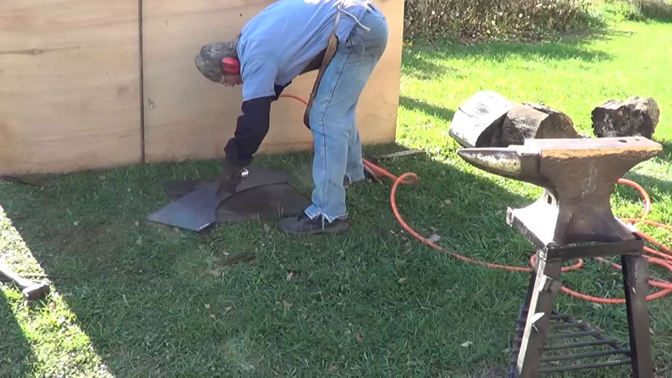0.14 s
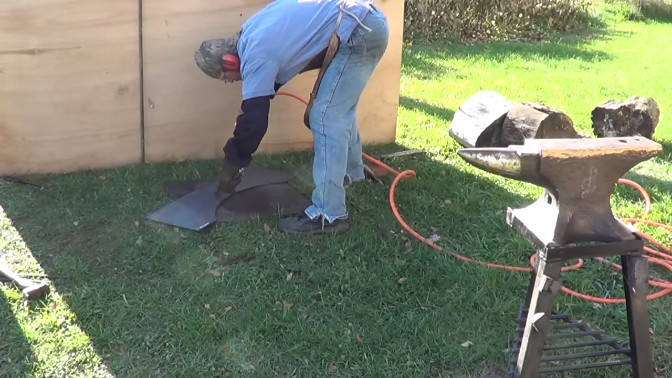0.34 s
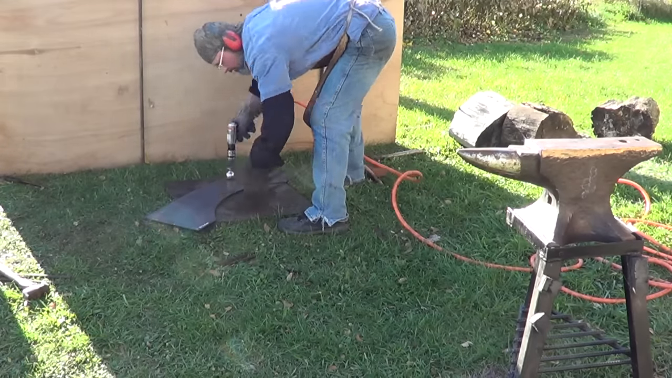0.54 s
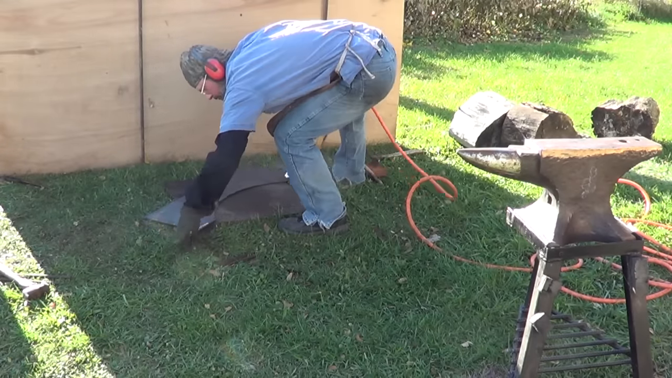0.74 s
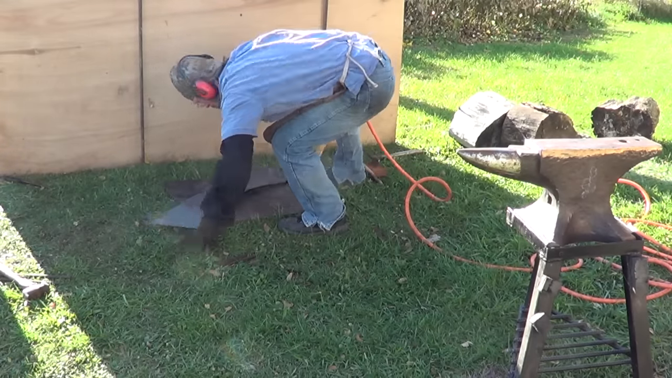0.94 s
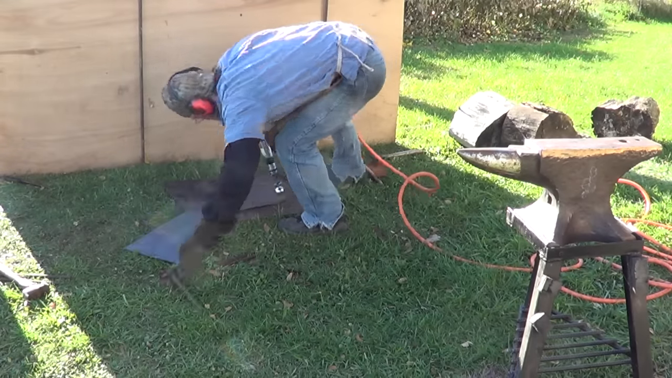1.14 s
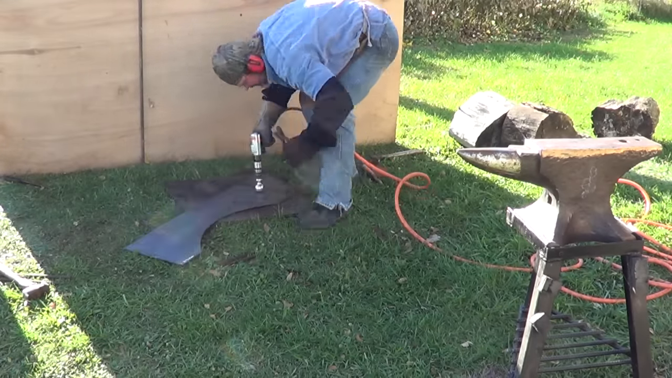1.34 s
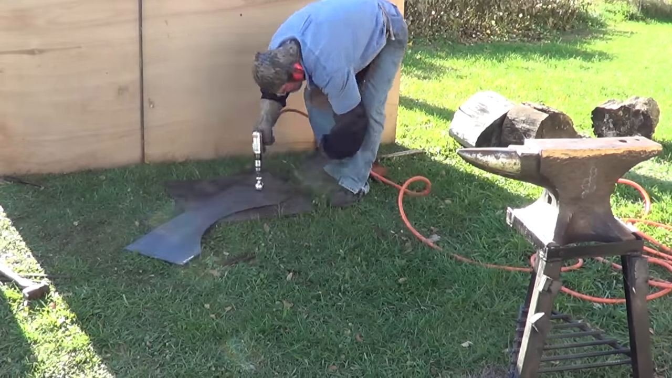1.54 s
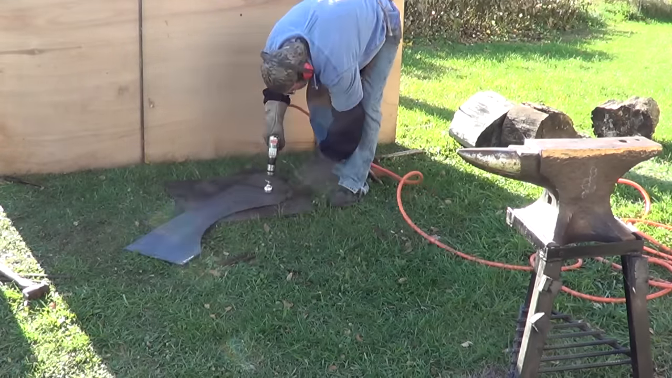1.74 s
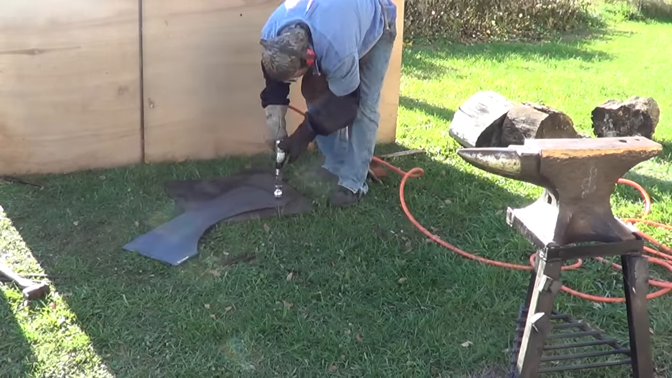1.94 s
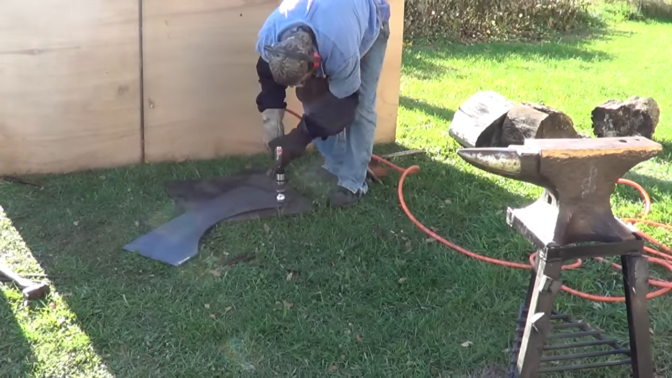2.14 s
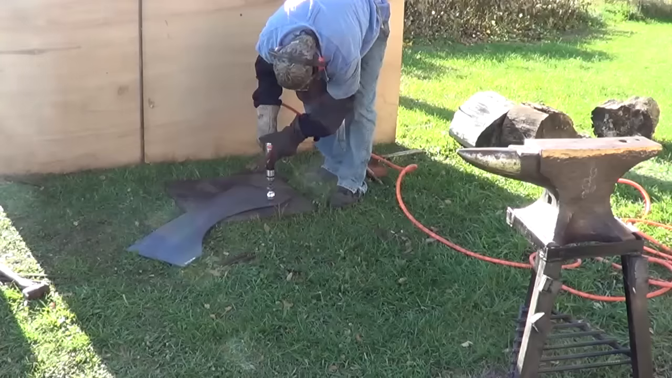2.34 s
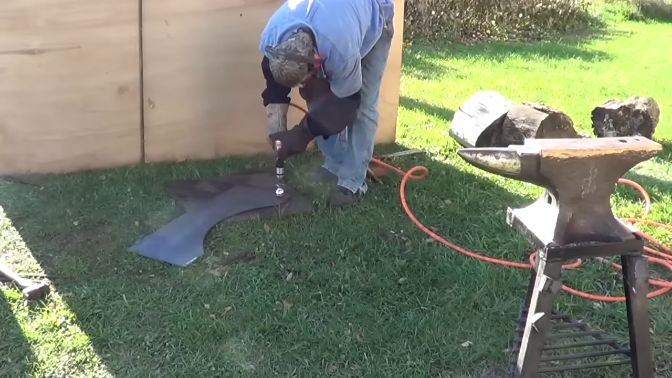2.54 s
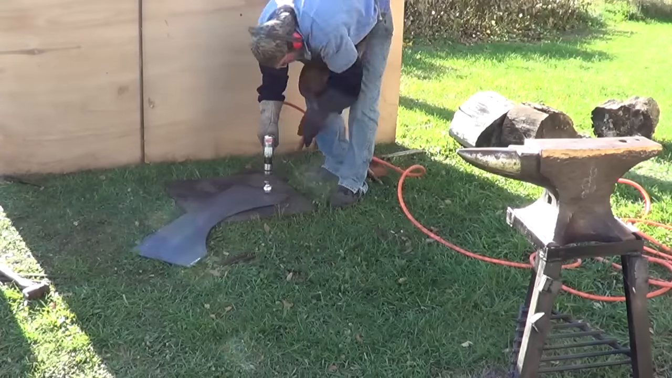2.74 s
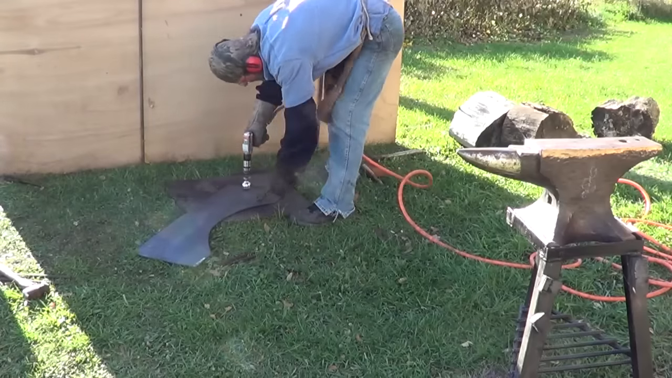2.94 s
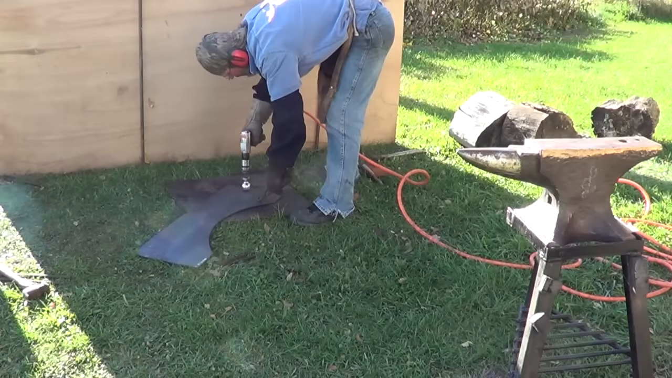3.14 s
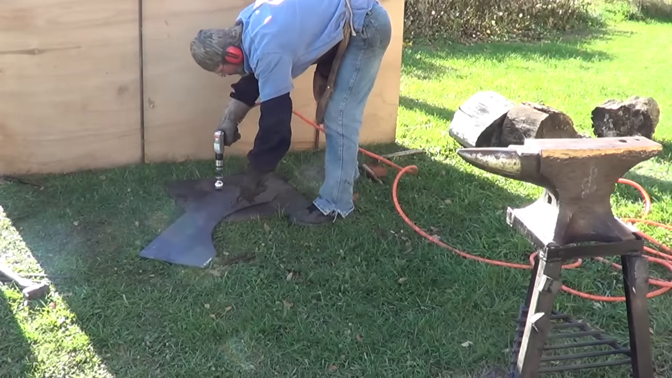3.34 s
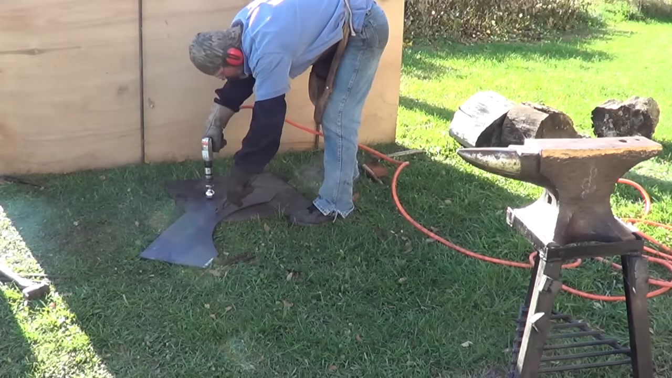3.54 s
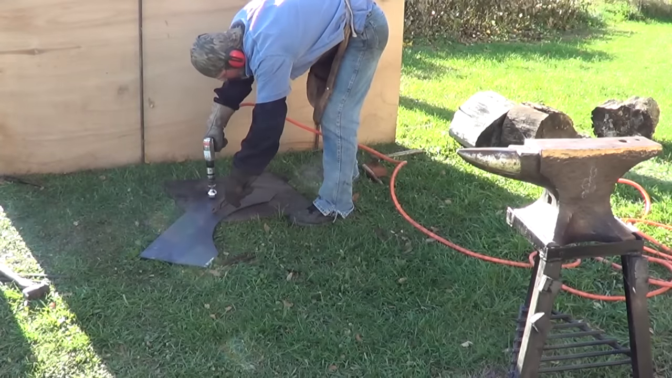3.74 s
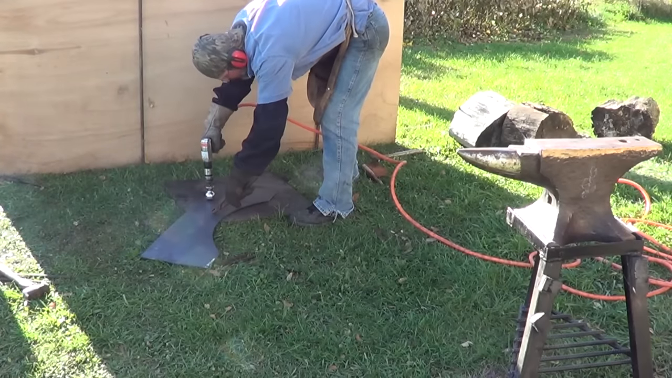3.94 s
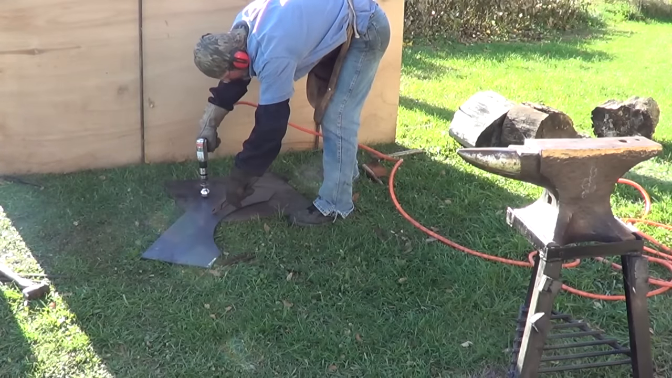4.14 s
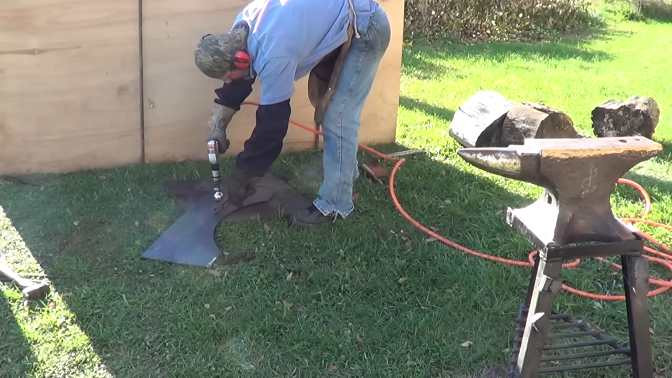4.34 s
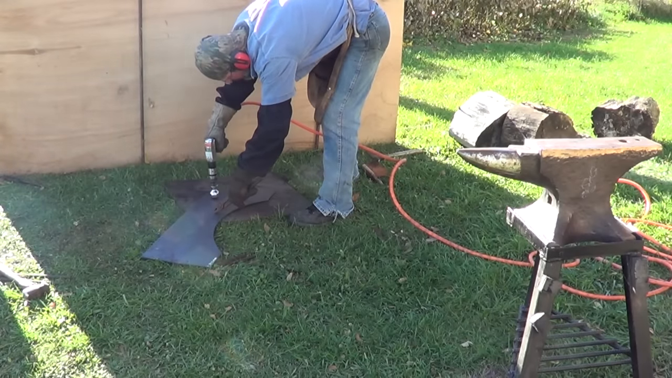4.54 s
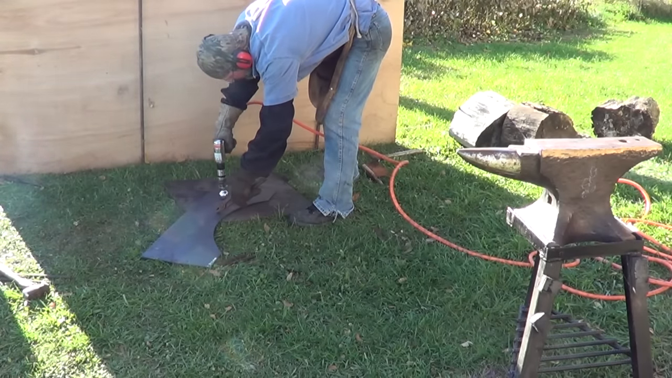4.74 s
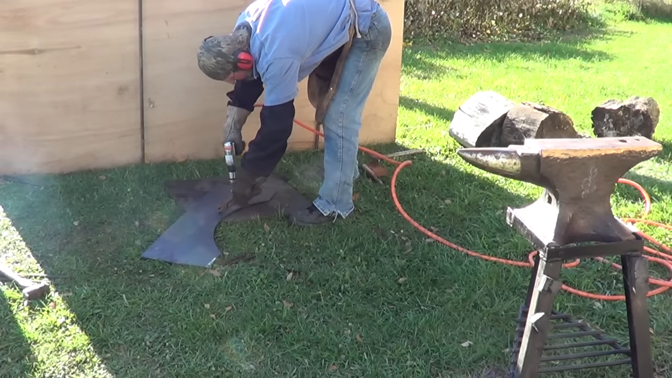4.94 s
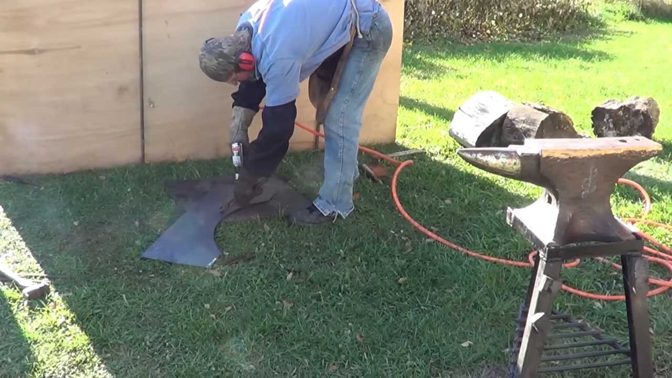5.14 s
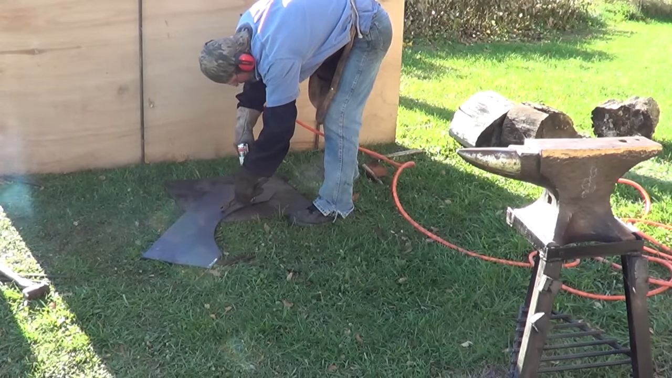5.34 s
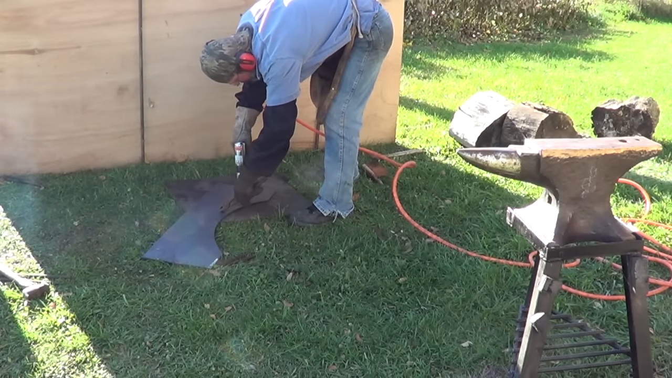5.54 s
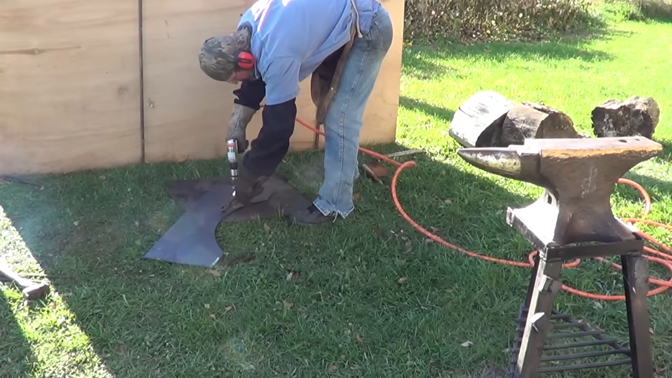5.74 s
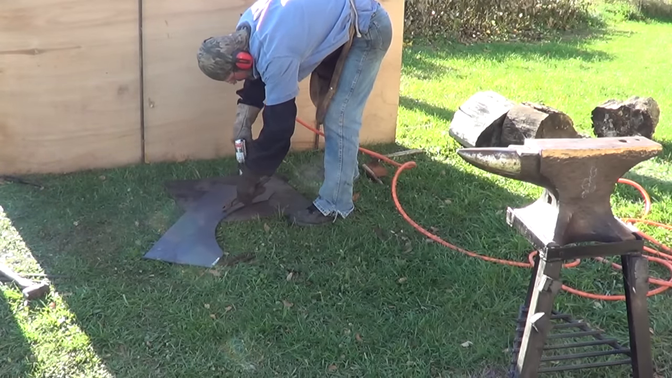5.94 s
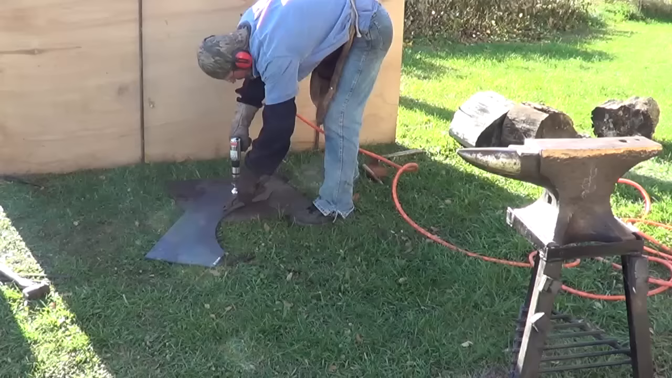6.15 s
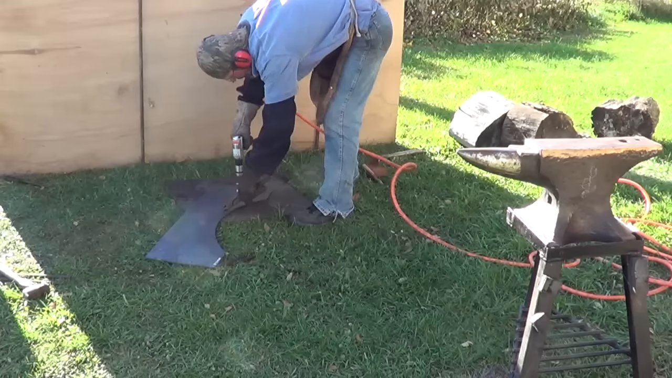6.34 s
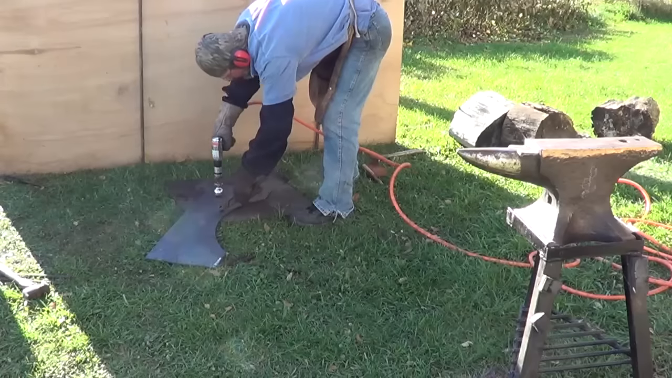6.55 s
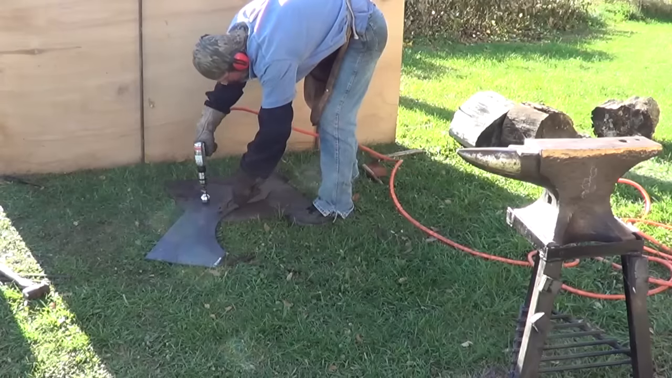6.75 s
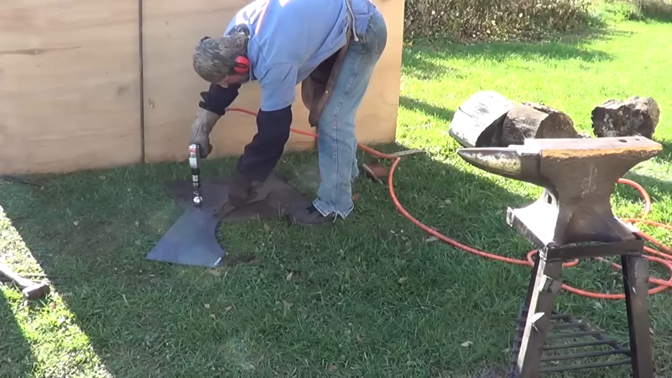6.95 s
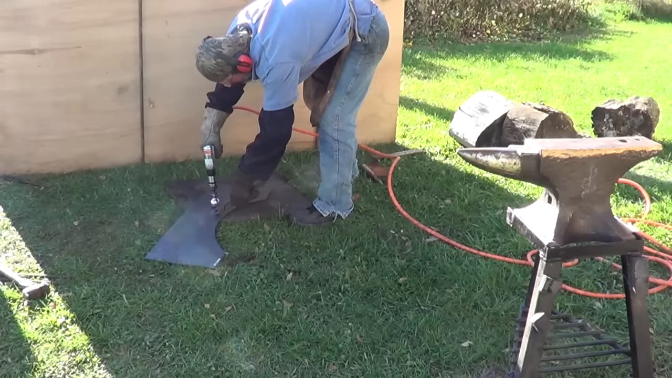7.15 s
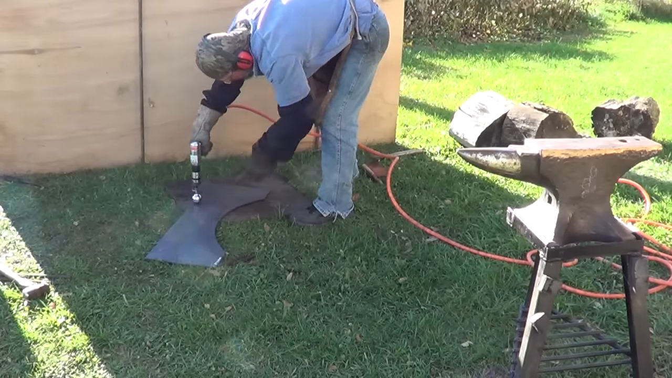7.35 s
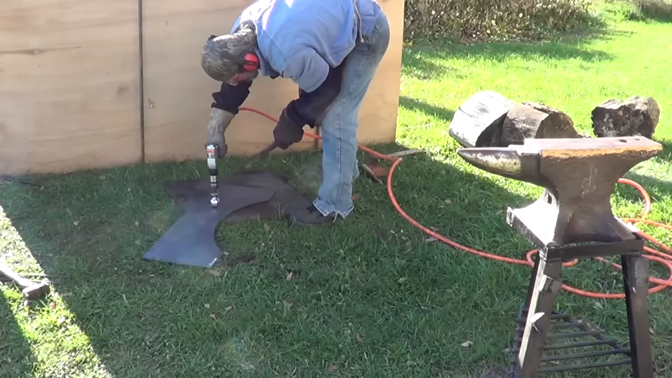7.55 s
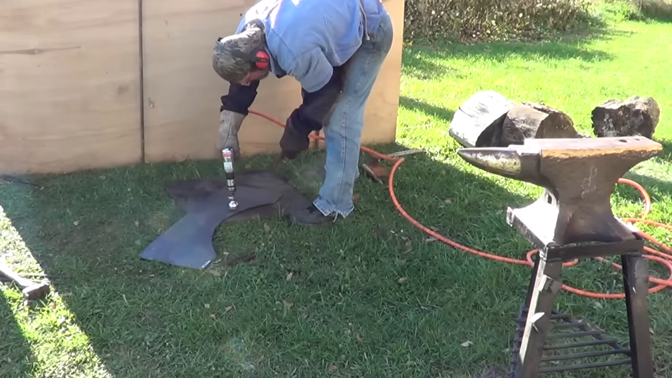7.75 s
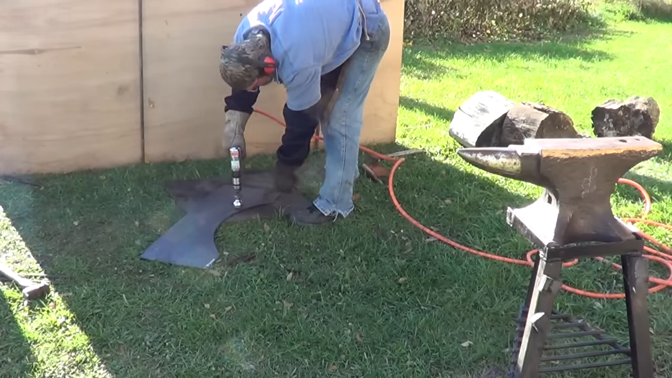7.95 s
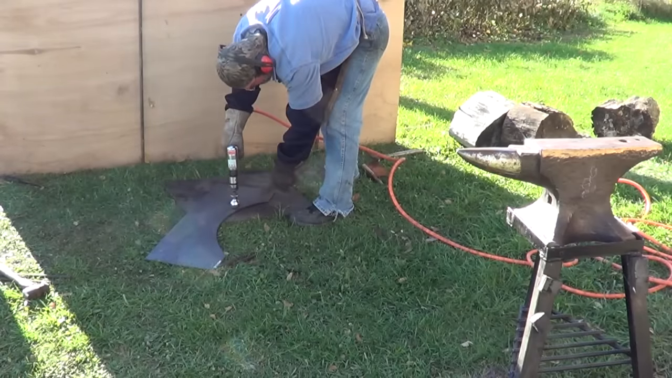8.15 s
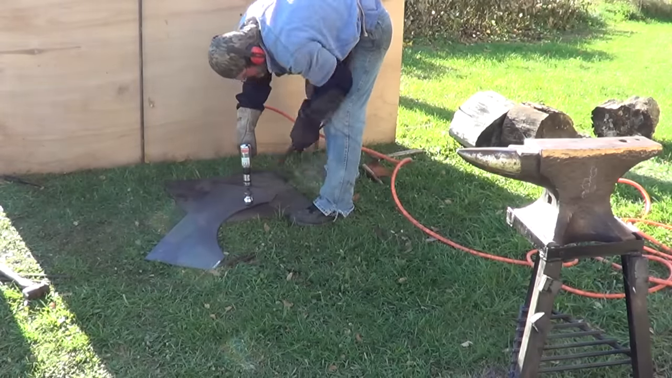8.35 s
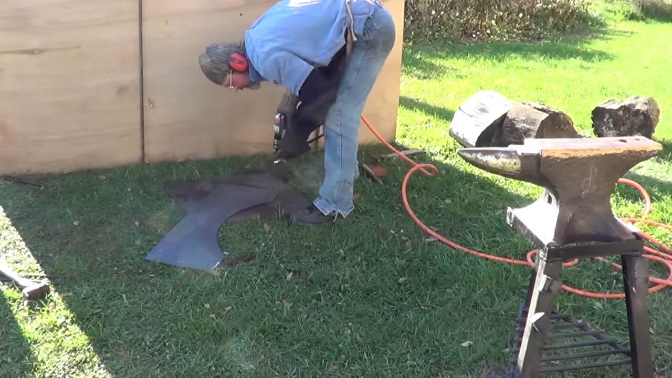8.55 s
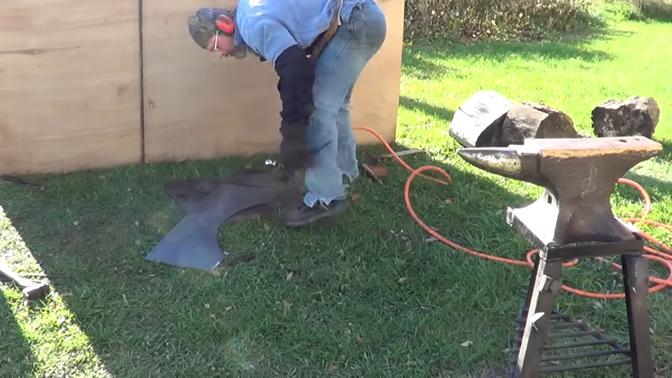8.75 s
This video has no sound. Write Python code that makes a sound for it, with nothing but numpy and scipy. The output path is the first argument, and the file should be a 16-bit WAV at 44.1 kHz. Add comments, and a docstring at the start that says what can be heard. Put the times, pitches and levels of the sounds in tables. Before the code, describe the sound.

An air chisel rattles on a steel plate, pauses as the plate clangs down, then hammers again over a droning compressor.

```python
"""An air chisel rattles on a steel plate lying on a lawn, in two bursts, over a compressor's drone.
Piston strokes buzz, the hopping tip scours the plate into ringing, and the shank sings under load.
In the pause the plate is lifted, dragged round and dropped, and the tip is set down again;
it skids, then bites. Gain control pushes the drone under the chisel and lets it swell in the pauses."""
import sys
import numpy as np
from scipy import signal
from scipy.fft import rfft, irfft, next_fast_len
from scipy.io import wavfile
from scipy.ndimage import uniform_filter1d

SR = 44100
rng = np.random.default_rng(int(sys.argv[2]) if len(sys.argv) > 2 else 0)


def output_pcm(signal):
    """Save a mono or channel-first signal as 16-bit PCM at the path in sys.argv[1].

    Samples are clipped to [-1, 1] before scaling.
    """
    pcm = np.clip(np.atleast_2d(signal).T, -1, 1) * 32767
    wavfile.write(sys.argv[1], SR, np.round(pcm).astype(np.int16))


N = 392030
TIME = np.arange(N) / SR


def amp(db):
    return 10 ** (np.asarray(db) / 20)


def unit_rms(x):
    return x / np.sqrt(np.mean(x ** 2) + 1e-20)


def curve(points):
    """Interpolates (time_s, value) points per sample."""
    return np.interp(TIME, *np.transpose(points))


def colour(x, points):
    """Filters by a (freq_hz, gain_db) curve."""
    hz, db = np.transpose(points)
    size = next_fast_len(len(x) + 4096)
    gain = amp(np.interp(np.log(np.fft.rfftfreq(size, 1 / SR) + 1), np.log(hz), db))
    return irfft(rfft(x, size) * gain, size)[:len(x)]


def wander(rate_hz):
    """Random drift, rms 1."""
    knots = rng.standard_normal(4096)
    return unit_rms(np.interp(TIME * rate_hz, np.arange(len(knots)), knots))


def resonate(x, hz, width_hz):
    """One mode, unity gain at its centre."""
    r = np.exp(-np.pi * width_hz / SR)
    angle = 2 * np.pi * hz / SR
    return signal.lfilter([1 - r, 0, r - 1], [1, -2 * r * np.cos(angle), r * r], x)


def ring(drive, hz, width_hz, skirt_hz):
    """One mode with steepened skirts, rms 1."""
    return unit_rms(resonate(resonate(drive, hz, width_hz), hz, skirt_hz))


def scour(force):
    """Countless tiny steel-on-steel contacts under a force envelope."""
    return force * rng.standard_normal(N)


def mode_cloud(t60_s):
    """Impulse response of countless close modes: decaying noise."""
    t = np.arange(SR // 4) / SR
    tail = rng.standard_normal(len(t)) * np.exp(-np.log(1000) * t / t60_s)
    return tail / np.linalg.norm(tail)


# Trigger pulls; the plate is turned between them, so each has its own colour:
# start_s, stop_s, fade_s, effort_db, release_rise_hz, release_ring_db, clatter_db, third_harmonic_db
BURSTS = [(-1.6, 0.5853, 0.01166, -19.5, 8, -20, -14, -32.5),
          (1.86, 8.521, 0.0126, -19, -0.5, -18.5, -19, -45)]
# Piston buzz, rising as the tool is leaned on; one curve per burst: time_s, level_db
BUZZ = [
    [(0.0, -36.5), (0.2, -40), (0.42, -42.5), (0.57, -50.5)],
    [(1.9, -51), (2.3, -47), (2.65, -47), (2.85, -42), (3.2, -38.5), (3.5, -40), (4.2, -39.5), (4.6, -37),
     (5.15, -43), (5.65, -40.5), (6.0, -37.5), (6.45, -35.5), (6.9, -39.5), (7.6, -36), (7.82, -47),
     (8.25, -44.5), (8.5, -48.5)],
]
SKID_S = 0.44


def air_tool(steady_hz=190.48, kick_s=0.047, bite_s=0.015, lift_s=0.0797, ease_s=1.0, usual_buzz_db=-38):
    """The stroke rate overshoots, drops as the tip bites, sags with hose pressure and rises on lifting."""
    row = np.searchsorted([burst[0] for burst in BURSTS[1:]], TIME, side="right")
    start_s, stop_s, fade_s, effort_db, rise_hz, *colours_db = np.array(BURSTS)[row].T
    age_s, left_s = np.maximum(TIME - start_s, 0), np.maximum(stop_s - TIME, 0)
    effort = amp(effort_db) * np.minimum(age_s / 0.0074, 1) * np.exp(-np.maximum(TIME - stop_s, 0) / fade_s)
    skidding = (1 - np.tanh((age_s - SKID_S) / bite_s)) / 2
    kick_hz = 13 * age_s / kick_s * np.exp(1 - age_s / kick_s)
    sag_hz = 7.3 * np.exp(-age_s / 2.5)
    rate_hz = steady_hz + kick_hz + sag_hz + 11.5 * skidding + rise_hz * np.exp(-left_s / lift_s)
    load_db = curve(np.vstack(BUZZ)) - usual_buzz_db
    eased = np.exp(-left_s / ease_s)  # the hand eases off before release
    return effort, rate_hz, load_db, eased, skidding, age_s, colours_db


# Dense ring of the plate: freq_hz, gain_db
STEEL_SPECTRUM = [(25, -26.5), (80, -22.5), (130, -21), (260, -23.5), (400, -19.5), (620, -20), (830, -4),
                  (1050, -5.5), (1600, -6.5), (2400, -2.5), (3400, 1.5), (4500, 1.5), (5100, 2), (7500, 6),
                  (10500, 5), (13500, 4.5), (15500, 2)]
# Single plate modes: pitch_hz, width_hz, gain_db, antinode_fraction, reach_fraction
PLATE_MODES = [(3210, 59, 2, 0.03, 0.1), (3630, 51, 2, 0.01, 0.11), (5513, 204, 1.5, 0.06, 0.19),
               (6225, 44, 1, 0.07, 0.12), (6627, 90, 2, 0.98, 0.1), (6840, 116, 5, 0.81, 0.24),
               (6757, 246, 2, 0.04, 0.12), (7566, 60.5, 3, 0.38, 0.21), (7846, 69, 5, 0.03, 0.14),
               (7975, 94, 3, 0.62, 0.27), (8160, 67, 8, 1.03, 0.07), (10713, 146, 1.5, 0.6, 0.26),
               (8603, 82, 3.5, 0.24, 0.4), (9990, 69, 2.5, 0.65, 0.41), (10580, 74, 2, 0.05, 0.17),
               (10970, 60, 5, 0.38, 0.22), (11480, 96, 4, 0.93, 0.2), (11810, 75, 4, 0.48, 0.19),
               (11980, 107, 4.5, 0.03, 0.12), (12254, 108, 3.5, 0.71, 0.11), (12670, 430, 0.5, 0.91, 0.52),
               (13034, 114, 2.5, 0.53, 0.36), (13400, 105, 8, 0.03, 0.2), (13564, 200, 6.5, 0.83, 0.2),
               (14040, 86, 7, 0.01, 0.02), (14163, 97, 5, 0.41, 0.29), (14300, 136, 8.5, 0.95, 0.22),
               (14520, 187, 1, 0.45, 0.2), (15230, 109, 5.5, 1.0, 0.06), (15440, 156, 4, 0.69, 0.26),
               (15760, 53, 6.5, 1, 0.24)]


def plate(force, place, direct, t60_s, modes_db, flicker_db):
    """A shifting dense ring plus single modes, each strongest with the contact on its antinode."""
    contacts = scour(force)
    shares = np.array([wander(7) for _ in range(6)])
    shares /= np.linalg.norm(shares, axis=0)
    cloud = sum(share * signal.oaconvolve(contacts, mode_cloud(t60_s))[:N] for share in shares)
    dense = colour(direct * scour(force) + cloud, STEEL_SPECTRUM) / np.hypot(direct, 1)
    drives = [scour(force) * amp(flicker_db * wander(11)) for _ in range(7)]
    modes = np.zeros(N)
    for k, (hz, width_hz, db, antinode, reach) in enumerate(PLATE_MODES):
        coupling = 1 / (1 + ((place - antinode) / reach) ** 2 / 2) ** 2
        modes += amp(db) * resonate(coupling * drives[k % len(drives)], hz, width_hz)
    return dense + amp(modes_db) * modes


def tip_hops(rate_hz=31, spread_db=3.0, decay_s=0.01495):
    """The tip hops unevenly; each landing is a short surge of its own size."""
    hop_count = np.floor(np.cumsum(rate_hz * np.exp(0.45 * wander(55))) / SR)
    landings = np.diff(hop_count, prepend=0) * amp(spread_db * wander(90))
    return unit_rms(signal.lfilter([1], [1, -np.exp(-1 / (decay_s * SR))], landings))


# Shank modes: pitch_hz, width_hz, skirt_hz, level_db, db_per_load_db
SHANK_MODES = [(5569, 74, 330, -18, 0.64), (7272, 57, 250, -14.5, 0.28), (9316, 65, 295, -10.5, 0.64)]


def shank(force, load_db):
    """The shank's own modes sing under load."""
    return sum(amp(db + per_load * load_db) * ring(scour(force), hz, width_hz, skirt_hz)
               for hz, width_hz, skirt_hz, db, per_load in SHANK_MODES)


# Close plate modes: pitch_hz, width_hz
BRIGHT_MODES = [(4385, 79), (4570, 192)]
# Their joint level: time_s, level_db
BRIGHT_LEVEL = [(0.3, -15.5), (2.1, -15.5), (2.52, -12), (2.8, -15.5), (5.7, -14.5), (6.42, -11),
                (6.7, -14), (7.75, -10), (7.92, -14.5)]


def bright_ring(force):
    """A cluster of close plate modes swells and recedes."""
    cluster = sum(ring(scour(force), hz, width_hz, skirt_hz=414) for hz, width_hz in BRIGHT_MODES)
    return amp(curve(BRIGHT_LEVEL)) * unit_rms(cluster)


# Mode flare-ups: centre_s, sigma_s, pitch_hz, level_db
FLARES = [(0.17, 0.057, 7875, -12), (3.7, 0.186, 14260, -12.5), (3.9, 0.216, 10920, -10),
          (5.1, 0.07, 11810, -10), (7.612, 0.086, 9350, -7), (7.82, 0.108, 11820, -9),
          (7.84, 0.097, 13740, -10.5)]


def flares(force, width_hz=113, skirt_hz=500):
    """The tip dwells on a spot and one mode flares up."""
    return sum(amp(db) * np.exp(-((TIME - centre_s) / sigma_s) ** 2 / 2)
               * ring(scour(force), hz, width_hz, skirt_hz) for centre_s, sigma_s, hz, db in FLARES)


# Piston harmonics: multiple, first_burst_db, second_burst_db
PISTON_HARMONICS = [(1, -30, -32.5), (4, -7.5, -25), (5, -20, -5.5), (6, -6.5, -1), (7, 2, 1.5),
                    (8, -6, -15.5), (9, -4.5, -7.5), (10, -2.5, -9), (12, -3, -8)]


def piston_buzz(cycles, load_db, third_db, second_db=-46.5, fourth_db=-42.5, stack_db=-17.5):
    """Fluttering harmonics of the stroke rate; the buzz grows under load."""
    def harmonic(k):
        return unit_rms(amp(0.55 * wander(25)) * np.cos(2 * np.pi * k * cycles))

    turned = TIME >= BURSTS[1][0]
    stack = sum(amp(np.where(turned, after_db, before_db)) * harmonic(k)
                for k, before_db, after_db in PISTON_HARMONICS)
    low_db = (second_db + 0.56 * load_db, third_db, fourth_db)
    low = sum(amp(db) * harmonic(k) for k, db in enumerate(low_db, 2))
    return low + amp(stack_db + 0.832 * load_db) * unit_rms(stack)


# Tip path along the plate: time_s, place_fraction
TIP_PATH = [(0.6, 0.03), (1.86, 0.93), (2.1, 1.03), (2.6, 0.95), (3.05, 0.75), (3.6, 0.45), (4.3, 0.38),
            (5.1, 0.42), (6.0, 0.45), (6.7, 0.43), (7.5, 0.44), (7.8, 0.65), (8.2, 0.6), (8.5, 0.73)]
# Brief losses of contact: centre_s, depth_fraction
MISSES = [(3.161, 0.54), (3.302, 0.44), (4.088, 0.48), (6.385, 0.7)]
LOW_MODE_HZ = 2119.1


def chisel(gain_db=2.5, grit_db=1.5, miss_s=0.0075, low_ring_db=-21.5, thud_db=-32.5):
    """Each stroke scours the plate and, once the tip bites, thuds on it; hops roughen the stream."""
    effort, rate_hz, load_db, eased, skidding, age_s, (release_db, clatter_db, third_db) = air_tool()
    cycles = np.cumsum(rate_hz * (1 + 0.0035 * wander(70))) / SR
    surge = unit_rms(1 + 0.714 * tip_hops())
    stroke = unit_rms(1 + 0.7 * np.exp(-(cycles % 1) / 0.097))
    contact = 1 - sum(depth * np.exp(-((TIME - centre_s) / miss_s) ** 2) for centre_s, depth in MISSES)
    force = effort * contact * surge * stroke * unit_rms(amp(grit_db * wander(400)))
    rattle = plate(force, curve(TIP_PATH), direct=0.368, t60_s=0.0677, modes_db=9, flicker_db=2.0)
    blows = np.diff(np.floor(cycles), prepend=0) * effort * (1 - skidding) * wander(110)

    low_gain = amp(low_ring_db) * (1 - eased) + release_db * 0
    low_gain = amp(low_ring_db * (1 - eased) + release_db * eased)
    low_ring = low_gain * ring(scour(force), LOW_MODE_HZ, width_hz=40.3, skirt_hz=146)
    singing = shank(force, load_db)
    clatter = amp(clatter_db) * ring(scour(force), hz=3425, width_hz=1410, skirt_hz=1800)
    thud = amp(thud_db) * ring(blows, hz=925.6, width_hz=257, skirt_hz=257)
    rings = low_ring + singing + clatter + thud + bright_ring(force) + flares(force)

    throb = unit_rms(signal.oaconvolve(surge ** 1.728, np.hanning(SR // 100), "same"))  # peaks on landings
    buzz = (1 - skidding) * throb * piston_buzz(cycles, load_db, third_db)
    skid = skidding * skid_chatter(rate_hz, cycles, age_s)
    return amp(gain_db) * (unit_rms(rattle) + rings + (buzz + skid) * unit_rms(effort) + pings())


# Compressor harmonics: multiple, level_db
DRONE_HARMONICS = [(1, -14.5), (2, -2.5), (3, -15), (4, -2), (5, -6.5), (6, -6.5), (7, -1.5), (8, 3),
                   (9, -4.5), (10, -3), (11, -3.5), (12, -15), (13, -1), (14, -2.5), (15, -7), (16, -3.5),
                   (17, -15), (18, -3.5), (19, -4), (21, -8.5), (23, -15.5), (24, -5), (25, -8.5)]


def compressor(pitch_hz=231.2, level_db=-34, top_db=-13, fall_db=0.16):
    """A steady buzzing stack whose high partials thin out."""
    cycles = np.cumsum(pitch_hz * (1 + 0.000452 * wander(6.8))) / SR
    high = [(k, top_db - fall_db * (k - 26) + 3 * rng.standard_normal()) for k in range(26, 52)]
    stack = sum(amp(db) * np.cos(2 * np.pi * k * cycles + 2.295 * rng.standard_normal())
                for k, db in list(DRONE_HARMONICS) + high)
    return amp(level_db) * unit_rms(stack)


# Air noise: freq_hz, gain_db
AIR_SPECTRUM = [(30, -32), (100, -17.5), (220, -13.5), (400, -11.5), (920, -8), (1450, -10.5), (1900, -5.5),
                (2400, -14), (3200, -9), (5700, -6.5), (6400, -10.5), (10500, -12.5), (12000, -19),
                (15500, -17.5)]


def air_rush(level_db=-40):
    """Rushing air from the compressor and the open garden."""
    return amp(level_db + 1.01 * wander(9)) * unit_rms(colour(rng.standard_normal(N), AIR_SPECTRUM))


# Handling the plate and seating the tip: start_s, level_db, decay_s
KNOCKS = [(0.737, -22.5, 0.00485), (0.872, -16, 0.00244), (1.03, -26, 0.0277), (1.052, -30, 0.0245),
          (1.088, -17, 0.0122), (1.166, -26, 0.0074), (1.183, -5.5, 0.0346), (1.213, -11, 0.0238),
          (1.243, -11, 0.0115), (1.364, -19, 0.0101), (1.402, -16.5, 0.0067), (1.609, -29, 0.0097),
          (1.647, -29.5, 0.0068), (1.69, -27.5, 0.0084)]
# Plate modes off the grass: pitch_hz, level_db
CLANG_MODES = [(845, -14), (2100, -9.5), (2720, -12), (3210, -2), (3440, -10.5), (6920, -6), (7250, -6.5),
               (7510, -8)]


def handling(ring_s=0.00445, bluntness=1.48, hardness=1.436, spread_hz=50):
    """Knocks and short scrapes ring the plate; the harder the knock, the more it clangs."""
    envelope, t = np.zeros(N), np.arange(SR // 4) / SR
    for start_s, db, decay_s in KNOCKS:
        envelope[round(start_s * SR):][:len(t)] += amp(db) * np.exp(-(t / decay_s) ** bluntness)
    force = envelope * unit_rms(amp(4.2 * wander(900)))
    steel = plate(force, place=0.364, direct=0.43, t60_s=0.063, modes_db=-3.5, flicker_db=0.5)
    modes = np.zeros(N)
    for hz, db in CLANG_MODES:
        gain = amp(db + 2.67 * wander(120))
        modes += gain * np.cos(2 * np.pi * np.cumsum(hz + spread_hz * wander(300)) / SR)
    pole = np.exp(-1 / (ring_s * SR))
    clang = signal.lfilter([1 - pole], [1, -pole], envelope ** hardness) * modes
    return clang + colour(steel, [(550, 1), (900, 6), (1400, -1.5), (2000, 3), (2900, -0.5),
                                  (3400, 3), (4100, -0.5), (15000, -2)])


# Edge touches: start_s, pitch_hz, level_db, decay_s
CLINKS = [(0.737, 2700, -31.5, 0.014), (1.03, 5685, -31, 0.022), (1.062, 2700, -27.5, 0.035),
          (1.089, 4506, -27.5, 0.0196), (1.091, 7214, -32, 0.015)]


def clinks(rise_s=0.0019):
    """A glancing touch on the plate's edge leaves one clear note."""
    out, t = np.zeros(N), np.arange(SR // 4) / SR
    for start_s, hz, db, decay_s in CLINKS:
        envelope = amp(db) * (1 - np.exp(-t / rise_s)) * np.exp(-t / decay_s)
        out[round(start_s * SR):][:len(t)] += envelope * np.sin(2 * np.pi * hz * t)
    return out


# Piston harmonics in the skid: multiple, level_db, slope_db_per_s
SKID_HARMONICS = [(2, -35.5, -46), (3, -36, -35.5), (4, -41, 17.5), (5, -28.5, -9), (6, -32.5, -3),
                  (7, -38, -5), (8, -35.5, 6.5), (9, -32.5, -1.5), (11, -28.5, -11.5)]


def skid_chatter(rate_hz, cycles, age_s, boom_hz=825, boom_half_width_hz=9.8, boom_db=11):
    """Before the bite the piston chatters fast; its fourth harmonic crosses a plate resonance."""
    detune = (4 * rate_hz - boom_hz) / boom_half_width_hz
    out = np.zeros(N)
    for k, db, slope in SKID_HARMONICS:
        boost_db = boom_db / (1 + detune ** 2) if k == 4 else 0
        chatter = unit_rms(amp(3 * wander(70)) * np.cos(2 * np.pi * k * cycles + 0.4 * wander(110)))
        out += amp(db + slope * np.minimum(age_s, SKID_S) + boost_db) * chatter
    return out


# Hard landings: peak_s, level_db
PINGS = [(2.807, -10), (3.391, -10), (3.624, -9.5), (4.318, -8), (4.339, -7.5), (4.435, -8.5),
         (4.575, -8.5), (5.63, -11.5), (6.363, -9), (6.474, -8.5), (6.666, -11), (7.428, -7), (7.483, -9),
         (7.509, -5), (7.62, -5.5), (7.823, -9), (8.003, -7.5), (8.224, -10), (8.305, -7.5), (8.334, -4.5),
         (8.497, -5.5), (8.527, -11)]


def pings(gain_db=-0.5, rise_s=0.0068, damped_s=0.0112, free_s=0.0254):
    """A few strokes pump up the plate's low mode, then the tip chokes it; the last two ring freely."""
    out, t = np.zeros(N), np.arange(-SR // 25, SR // 5) / SR
    for k, (peak_s, db) in enumerate(PINGS):
        decay_s = free_s if k >= len(PINGS) - 2 else damped_s
        swell = np.exp(-(np.minimum(t, 0) / rise_s) ** 2 / 2 - np.maximum(t, 0) / decay_s)
        hz = LOW_MODE_HZ * (1 + 0.005 * rng.standard_normal())
        tone = np.cos(2 * np.pi * (hz * t + rng.random()))
        out[round((peak_s + t[0]) * SR):][:len(t)] += amp(gain_db + db) * swell * tone
    return out


# Echo colour: freq_hz, side_minus_mid_db
ECHO_SPECTRUM = [(60, -13), (150, -12), (500, -12), (2500, -18.5), (5000, -16.5), (9000, -12.5),
                 (14000, -12)]
# Stereo balance: freq_hz, left_minus_right_db
BALANCE = [(200, 0), (1000, 0), (4000, -0.5), (8000, 0.5), (14000, 1.49)]


def scene(echo_s=0.006):
    """All sources stand ahead; a restless echo from a wooden screen gives a little width."""
    mid = chisel() + handling() + clinks() + compressor() + air_rush()
    echo = np.pad(mid, (round(echo_s * SR), 0))[:N] * wander(45)
    side = colour(echo, ECHO_SPECTRUM)
    return np.array([colour(mid + sign * side, np.array(BALANCE) * [1, sign / 2]) for sign in (1, -1)])


def gain_control(x, ceiling_db=-17.5, slack_db=9, release_db_per_s=130, sink_db_per_s=45,
                 recover_db_per_s=12, block=64):
    """A quick limiter, backed by a slow stage that sinks under long loud sounds and creeps back."""
    power = uniform_filter1d((x ** 2).mean(0), size=400)[::block]
    over_db = np.maximum(10 * np.log10(abs(power) + 1e-12) - ceiling_db, 0)
    step_s = block / SR
    quick_db, slow_db, cut_db = over_db[0], over_db[:40].max() - slack_db, []
    for need_db in over_db:
        quick_db = max(need_db, quick_db - release_db_per_s * step_s)
        if need_db > slack_db:
            gap_db = need_db - slack_db - slow_db
            slow_db += np.clip(gap_db, -recover_db_per_s * step_s, sink_db_per_s * step_s)
        else:
            slow_db -= recover_db_per_s * step_s
        cut_db.append(max(quick_db, slow_db))
    return x / amp(np.interp(np.arange(N), np.arange(len(cut_db)) * block, cut_db))


def record(dry):
    """Gain control, then a low-pass."""
    lowpass = signal.firwin(511, cutoff=15850, window=("kaiser", 9), fs=SR)
    return signal.oaconvolve(gain_control(dry), lowpass[None], "same")


dry = scene()
out = record(dry)
output_pcm(out)
```